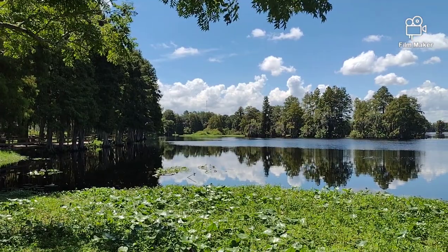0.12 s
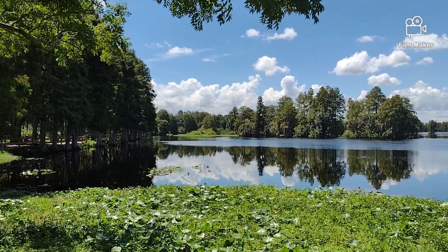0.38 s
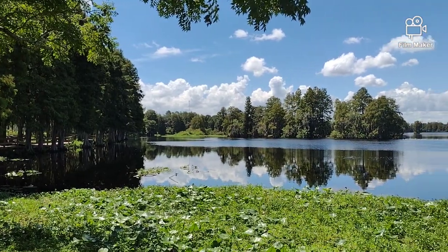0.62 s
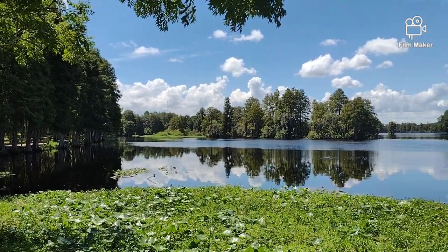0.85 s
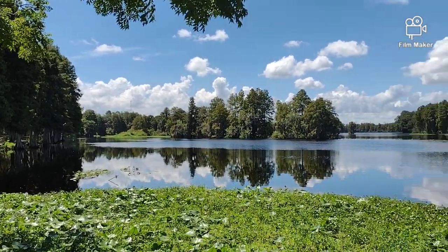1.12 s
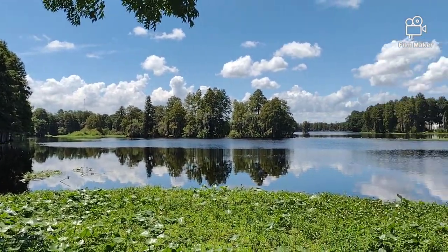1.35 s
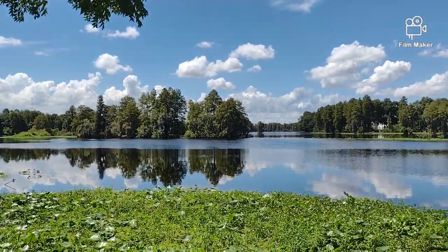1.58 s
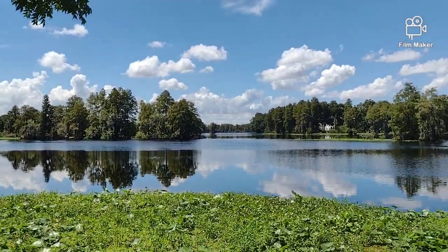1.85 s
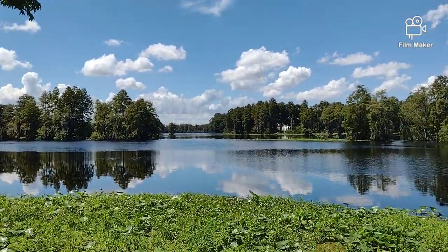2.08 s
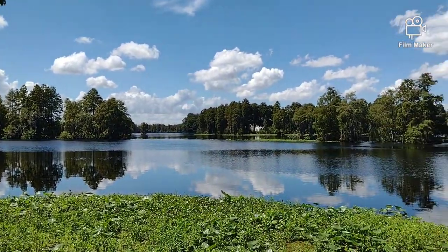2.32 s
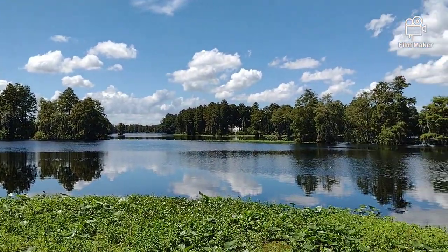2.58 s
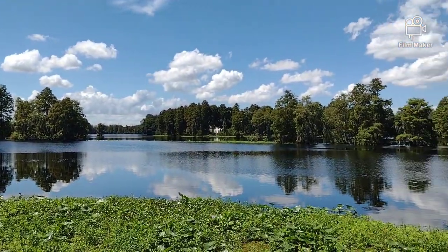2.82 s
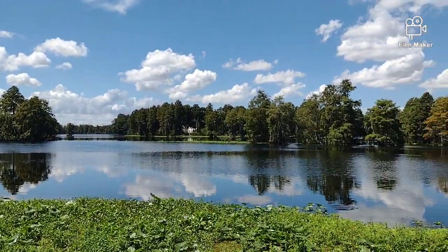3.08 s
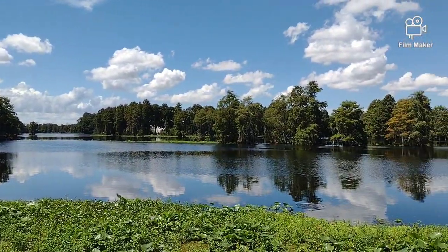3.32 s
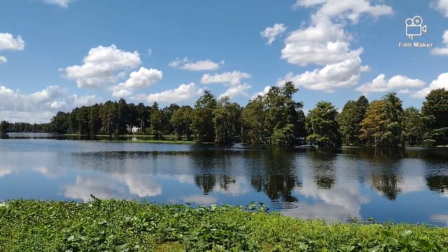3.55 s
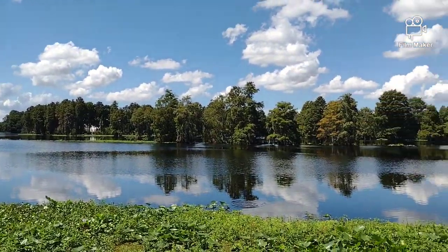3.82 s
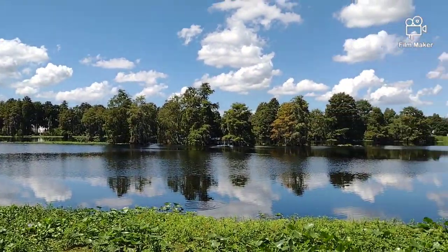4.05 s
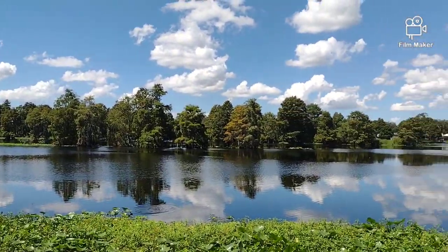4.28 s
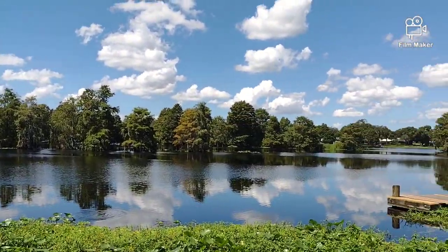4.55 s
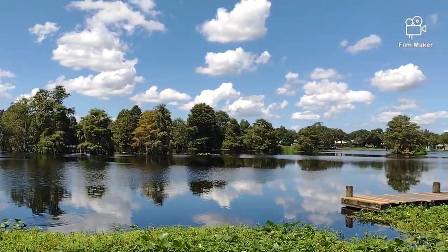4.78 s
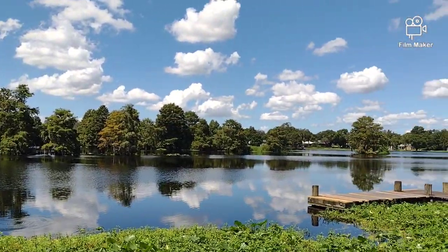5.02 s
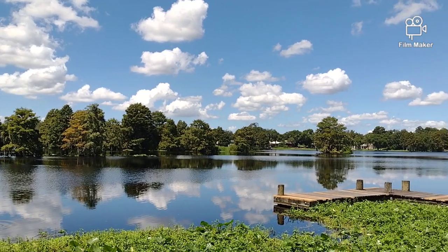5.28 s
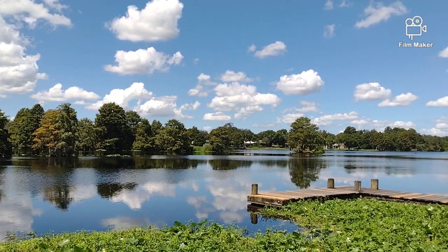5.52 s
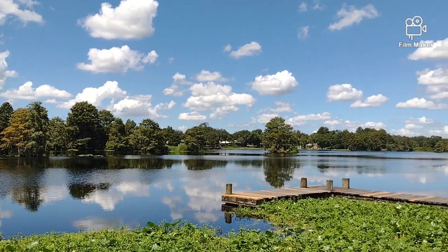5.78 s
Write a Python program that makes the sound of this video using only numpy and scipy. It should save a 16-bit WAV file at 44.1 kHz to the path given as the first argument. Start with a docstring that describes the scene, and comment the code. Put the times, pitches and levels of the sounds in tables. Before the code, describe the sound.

Outdoors by still water and trees, small birds chatter close by in quick, scratchy, drooping notes, mixed with short buzzes, falling chirps and thin double whistles. After almost four seconds a similar passage returns softer, and near the end a buzz and falling chirp stand out. Far birds twitter underneath, two faint coos pass mid-way, and light wind rumbles low, stronger on the right. The stereo microphone hears the birds centred, with very short tree echoes.

```python
"""Trees beside still water, where small birds chatter, buzz, chirp and whistle in the centre.
The calls are fluttering partials or pairs of sliding sines, with short echoes from the trees.
One passage sounds again, later and softer. Hundreds of short slides merge into a far twitter.
Two faint dove-like coos are wavering sines; light wind is low noise, strongest on the right port."""
import sys
import numpy as np
from scipy import signal
from scipy.fft import rfft, irfft
from scipy.io import wavfile

SR = 44100
rng = np.random.default_rng(int(sys.argv[2]) if len(sys.argv) > 2 else 0)


def pcm_store(signal):
    """Save signal as 16-bit PCM."""
    levels = np.round(np.clip(np.atleast_2d(signal), -1, 1) * 32767)
    wavfile.write(sys.argv[1], SR, levels.astype(np.int16).T)


def invert_db(x):
    """Field ratio 10**(x/20) for x, a level in decibels (scalar or array-like)."""
    u = np.asarray(x, float) / 20
    return 10 ** u


N = 259749

# Spectrum of the wideband noise that rises and falls with the chatter, the buzzes and the far twitter.
# Each row: frequency in Hz, relative level in dB.
CALL_NOISE = [(1100, -49), (1500, -0.5), (2400, -8.5), (3800, 1), (5200, -4), (6500, -16), (8000, -22.5),
              (15000, -35.5)]


def shade(points, hz):
    """Gain of a spectrum, given as (Hz, dB) rows, at the given frequencies."""
    at_hz, db = np.transpose(points)
    return invert_db(np.interp(np.log(np.maximum(hz, 1)), np.log(at_hz), db))


def noise(points):
    """Noise with a spectrum, rms 1."""
    spectrum = rfft(rng.standard_normal(N))
    shaped = irfft(spectrum * shade(points, np.fft.rfftfreq(N, 1 / SR)), N)
    return shaped / shaped.std()


def wobble(hz):
    """Smooth chance movement, mostly below the given rate, spread 1."""
    return noise([(hz, 0), (2 * hz, -20), (4 * hz, -60)])


def curve(table):
    """Gain over time from (s, dB) rows."""
    return invert_db(np.interp(np.arange(N) / SR, *np.transpose(table)))


def span(start, length):
    """Samples of one call and the progress 0-1 through it."""
    first = max(int(start * SR), 0)
    at = np.arange(first, min(int((start + length) * SR), N))
    return at, np.clip((at / SR - start) / length, 0, 1)


def sine(hz):
    """A sine that follows a moving pitch."""
    return np.sin(2 * np.pi * np.cumsum(hz) / SR)


def stack(hz, low, jitter, mouth):
    """Four partials of an unsteady membrane; the throat, tuned up by an open beak, picks the loudest."""
    # Throat resonance. Each row: frequency in Hz before the beak scales it, relative level in dB.
    throat = [(2000, -41), (2800, -1), (3800, 10), (4800, 12.5), (5800, -6.5), (6800, -11), (8000, -75)]
    phase = 2 * np.pi * np.cumsum(hz * (1 + jitter)) / SR
    partials = (2, 3, 4)
    gains = np.array([shade(throat, k * hz / mouth) for k in partials])
    upper = sum(g * np.sin(k * phase) for k, g in zip(partials, gains))
    upper = upper / np.sqrt(np.mean(np.sum(gains ** 2, axis=0)))
    return np.sqrt(2) * (upper + low * np.sin(phase))


def chatter(notes, start_hz=1430, grit=0.3, low_db=-11):
    """Each note leaps to its top and droops; a higher push makes it rougher and, up to a limit, longer."""
    out, jitter, flutter, call_noise = np.zeros(N), wobble(186), wobble(199), noise(CALL_NOISE)
    shake, noise_db = .03, -8
    for (s, db, hz), vary in zip(notes, rng.uniform(.75, 1.25, len(notes))):
        push = hz / 1800
        length = .044 * min(push, 1.1)
        at, u = span(s - .4 * length, length)
        rise = np.sin(np.pi / 2 * np.clip(u * vary / .38, 0, 1)) ** 1.496
        droop = 0.2776 * vary * np.clip((u - .35) / .65, 0, 1) ** 1.542
        mouth = 1.15 - 0.31 * u  # the beak closes through the note
        first_hz = start_hz - 0.1984 * (hz - start_hz)  # a harder push starts from lower down
        pitch = first_hz + (hz - first_hz) * rise - hz * droop
        low = invert_db(low_db) * push ** 2 * np.sqrt(np.sin(np.pi * u))
        tone = stack(pitch, low, shake * push ** 3 * jitter[at], mouth)
        rough_tone = tone * (1 + grit * push * flutter[at])
        note_noise = invert_db(noise_db) * push ** 2 * call_noise[at]
        shape = np.sin(np.pi * u ** 0.69) ** 1.67
        out[at] += invert_db(db) * shape * (rough_tone + note_noise)
    return out


def phrases(rows):
    """Chattered phrases: pitch moves evenly but for scatter; higher notes are louder and further apart."""
    slowing = 0.68  # the gap grows as this power of the pitch
    louder_db_per_octave = 4.5
    scatter_db, scatter_pitch = 1.2, .02  # chance spread from note to note; pitch as a fraction
    notes = []
    for first, last, gap, first_hz, last_hz, db in rows:
        hz = np.linspace(first_hz, last_hz, round((last - first) / gap) + 1)
        beat = np.cumsum(hz ** slowing) - hz[0] ** slowing
        start = first + (last - first) * beat / max(beat[-1], 1)
        level_chance, pitch_chance = rng.standard_normal((len(hz), 2)).T
        level_db = db + louder_db_per_octave * np.log2(hz / 1800) + scatter_db * level_chance
        notes += zip(start, level_db, hz * (1 + scatter_pitch * pitch_chance))
    return chatter(notes)


def buzz(rows, beat_hz=330, low_db=-13):
    """A held stack chopped by a slower flutter, which gives each partial sidebands."""
    out, jitter, drift, call_noise = np.zeros(N), wobble(185), wobble(30.34), noise(CALL_NOISE)
    chop = 1 + .55 * sine(beat_hz * (1 + .2 * drift))
    shake, noise_db = .019, -10
    for s, length, hz, db in rows:
        at, u = span(s, length)
        pitch = hz * (1 + .1 * np.sin(.8 * np.pi * u))
        tone = stack(pitch, invert_db(low_db), shake * jitter[at], 1.1 - 0.16 * u)
        shape = np.sin(np.pi * u ** .8) ** .4 * invert_db(1.2 * drift[at])
        out[at] += invert_db(db) * shape * chop[at] * (tone + invert_db(noise_db) * call_noise[at])
    return out


def glides(rows, second_db=-3, shake=0.0071, grit=0.42):
    """Both sides of the voice slide together, slowly at first; close together they beat."""
    out, jitter, flutter = np.zeros(N), wobble(190), wobble(102)
    for s, length, from_hz, to_hz, db, gap_hz in rows:
        at, u = span(s, length)
        slide = np.sin(1.4 * np.abs(u - .12) / .88) ** 2
        hz = (from_hz + (to_hz - from_hz) * slide) * (1 + shake * jitter[at])
        tone = sine(hz) + invert_db(second_db) * sine(hz - gap_hz)
        shape = np.sin(np.pi * u) ** .7
        out[at] += invert_db(db) * shape * (1 + grit * flutter[at]) * tone
    return out


def two_voiced(gap_hz, second_db):
    """A glide singer whose second voice lies a set step lower."""
    return lambda rows: glides([(*row, gap_hz) for row in rows], second_db)


def trees(x, t60, dull_hz=5000):
    """Scattered echoes from trunks and leaves: decaying noise, dulled in the treble."""
    t = np.arange(int(t60 * SR)) / SR
    tail = rng.standard_normal(len(t)) * np.exp(-np.log(1000) * t / t60)
    tail = signal.sosfilt(signal.butter(1, dull_hz, fs=SR, output="sos"), tail)
    return signal.fftconvolve(x, tail / np.linalg.norm(tail))[:N]


def flock(count=400):
    """Many far birds: scattered slides blurred by the trees, merging into a murmur."""
    # Swell of the far twitter. Each row: time in seconds, level in dB of the slides with their echoes.
    swell = [(.5, -24.5), (.58, -38.5), (.8, -29.5), (1.9, -26), (2.35, -27.5), (2.47, -42.5), (2.7, -37),
             (3.2, -22), (3.5, -39), (4.2, -37.5), (4.45, -52.5), (4.6, -36), (5.35, -33.5), (5.77, -37.5),
             (5.89, -36)]
    when, pitch, duration, bend, softness = rng.random((count, 5)).T
    hz = 2500 * 2.3 ** pitch
    start, length = when * (N / SR - .01), .02 + .03 * duration
    rows = np.c_[start, length, hz, hz * (.75 + .3 * bend), -8 * softness, 500 * bend]
    slides = glides(rows)
    blur = slides + invert_db(-4.5) * trees(slides, 0.15)
    return curve(swell) * (blur / blur.std() + invert_db(-5) * noise(CALL_NOISE))


def coos():
    """Soft low sine notes, unsteady in pitch and level."""
    # The coos. Each row: start in seconds, length in seconds, start in Hz, end in Hz, base level in dB.
    coo_notes = [(2.33, .21, 439, 436, -52.5), (3.137, 0.2, 492, 386, -46)]
    out, waver = np.zeros(N), wobble(24)
    for s, length, from_hz, to_hz, db in coo_notes:
        at, u = span(s, length)
        hz = (from_hz + (to_hz - from_hz) * u ** 1.53) * (1 + 0.026 * waver[at])
        out[at] += invert_db(db + 5.7 * waver[at]) * np.sin(np.pi * u) ** .5 * sine(hz)
    return out


def wind():
    """Buffeting as low noise, unrelated between ports but swelling together, strongest on the right."""
    # Rumble spectrum. Each row: frequency in Hz, relative level in dB.
    gust = [(20, -43), (60, -0.5), (107, 2), (180, -6), (340, -23), (600, -41), (2000, -90)]
    # Strength of the wind. Each row: time in seconds, base level in dB.
    strength = [(0, -57.5), (1.3, -53.5), (1.85, -58.5), (2.1, -39.5), (2.5, -47), (3, -40), (3.5, -43.5),
                (4, -59), (4.7, -69.5), (5.2, -53.5), (5.89, -53)]
    swell_db = 2.2 * wobble(5)
    return curve(strength) * np.array([invert_db(port_db + swell_db) * noise(gust) for port_db in (-8, 5)])


def air():
    """Hiss of the air, alike at both ports, and low air noise in opposite polarity at the two."""
    # Hiss spectrum. Each row: frequency in Hz, relative level in dB.
    hiss = [(100, -6), (400, -14), (1000, -15), (2000, -5.5), (6000, -14.5), (15500, -17.5)]
    # Strength of the hiss. Each row: time in seconds, level in dB.
    breeze = [(3.4, -44.5), (4.2, -48)]
    low = [(250, 14.5), (700, -12.5), (1500, 6.5), (3000, -66)]  # (Hz, dB)
    spread = invert_db(-62) * noise(low) * np.array([[1], [-1]])
    return curve(breeze) * noise(hiss) + spread


def scene():
    """Near birds with their echoes, the far flock, coos, wind and air."""
    # Chatter phrases. Each row: first note in seconds, last note in seconds, mean gap in seconds,
    # first top in Hz, last top in Hz, base level in dB for a note at 1800 Hz.
    chatter_rows = [(0.019, .152, .066, 1498, 1517, -14.5), (0.213, .33, .059, 1538, 1798, -14.5),
                    (0.397, .526, .065, 1986, 1996, -15.5), (0.614, .615, .07, 2154, 2170, -22),
                    (0.769, 1.226, .076, 1778, 2226, -19.5), (1.39, 1.392, .07, 1634, 1640, -20),
                    (0.644, .72, .074, 1786, 1930, -21.5), (0.826, 1.213, .065, 1668, 1554, -20.5),
                    (1.275, 1.661, .0645, 1681, 1860, -16.5), (1.726, 1.877, .075, 1666, 1951, -18.5),
                    (1.943, 2.166, .074, 1791, 1931, -17), (2.229, 2.258, .03, 1605, 1934, -20),
                    (2.312, 2.406, .093, 2140, 2045, -13.5), (2.388, 2.428, .04, 1985, 2295, -31),
                    (2.561, 2.69, .064, 1502, 1524, -19), (2.755, 2.974, .073, 1852, 1940, -19),
                    (3.051, 3.129, .079, 1976, 2040, -16.5), (3.003, 3.186, .091, 1790, 2102, -17.5),
                    (3.223, 3.479, .085, 2083, 2043, -18.5), (3.579, 3.706, .064, 1862, 1500, -20)]
    # Long buzzy calls. Each row: start in seconds, length in seconds, starting pitch in Hz, base level in dB.
    buzz_rows = [(1.447, 0.16, 1597, -23), (1.665, 0.1, 1607, -20), (0, 0.056, 1610, -37.5),
                 (0.199, 0.21, 1525, -28.5), (0.441, 0.057, 1635, -28), (1.845, 0.088, 1562, -24.5),
                 (5.034, 0.039, 1440, -27.5), (5.589, 0.1, 1455, -22), (5.782, 0.079, 1520, -32)]
    # Chirps, mostly falling, two voices close enough to beat. Each row: start in seconds,
    # length in seconds, nominal start in Hz, nominal end in Hz, base level in dB.
    chirp_rows = [(0.29, 0.049, 6220, 5800, -21.5), (1.056, 0.036, 3520, 2666, -24.5),
                  (1.509, 0.083, 3750, 2150, -25), (1.707, 0.071, 3444, 2300, -24.5),
                  (.24, 0.16, 3090, 2430, -30), (1.883, 0.074, 3530, 2530, -28.5),
                  (2.243, 0.11, 6000, 5700, -40), (2.76, 0.064, 6200, 4960, -34),
                  (2.297, 0.049, 2043, 2430, -24.5), (2.401, 0.044, 2600, 2180, -21),
                  (3.324, 0.047, 3700, 3330, -21), (5.053, .11, 3310, 2480, -26.5),
                  (5.622, 0.11, 3403, 2450, -20), (5.831, 0.055, 3460, 2610, -36)]
    # Double whistles, two voices heard apart. Each row: start in seconds, length in seconds,
    # nominal start in Hz, nominal end in Hz, base level in dB.
    whistle_rows = [(0.944, 0.067, 6200, 5740, -25), (1.532, 0.05, 6130, 5420, -23),
                    (1.581, 0.062, 6683, 6180, -25), (1.802, 0.047, 5550, 5220, -28.5),
                    (3.975, 0.023, 2570, 3080, -21.5)]
    chirp = two_voiced(gap_hz=164, second_db=1.5)
    whistle = two_voiced(gap_hz=623, second_db=-2.5)
    # the first rows of each table form one passage that sounds again, later and softer
    again_s, again_db = 3.741, -6
    singers = [(phrases, chatter_rows, 6), (buzz, buzz_rows, 2), (chirp, chirp_rows, 4), (whistle, whistle_rows, 4)]
    near, lag = np.zeros(N), int(again_s * SR)
    for voice, table, passage_rows in singers:
        passage = voice(table[:passage_rows])
        near += passage + voice(table[passage_rows:])
        near[lag:] += invert_db(again_db) * passage[:N - lag]
    birds = near + invert_db(-8.0) * trees(near, 0.048) + flock()
    # small birds radiate almost nothing below their lowest partial
    birds = signal.sosfilt(signal.butter(8, 1350, "high", fs=SR, output="sos"), birds)
    placed_coos = invert_db([[-1.5], [1.5]]) * coos()  # slightly to the right
    return birds + placed_coos + wind() + air()


def top_cut(x):
    """Nothing passes above the cut-off."""
    return signal.sosfilt(signal.butter(12, 15680, fs=SR, output="sos"), x)


def record(dry):
    """Peaks are held to full scale."""
    mix = np.clip(dry, -1, 1)
    return top_cut(mix)


dry = scene()
out = record(dry)
pcm_store(out)
```